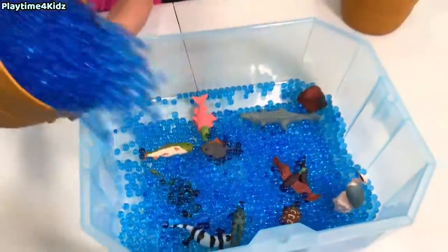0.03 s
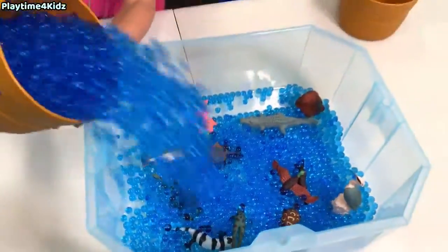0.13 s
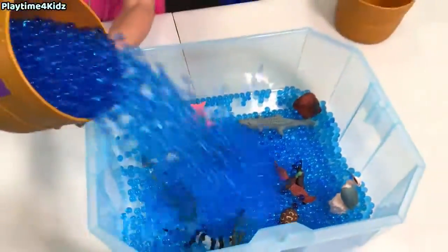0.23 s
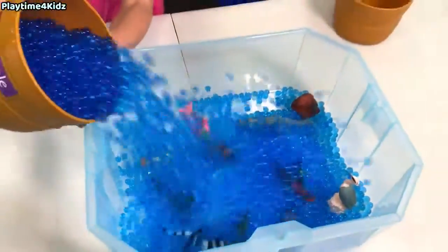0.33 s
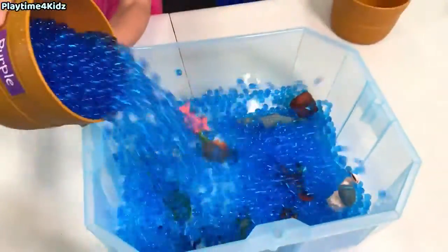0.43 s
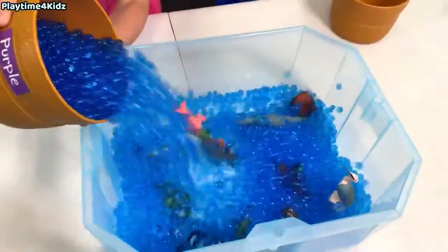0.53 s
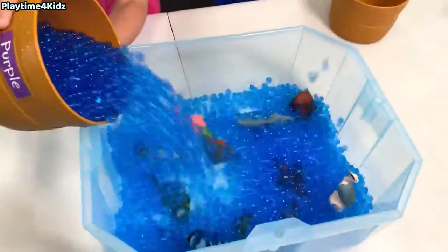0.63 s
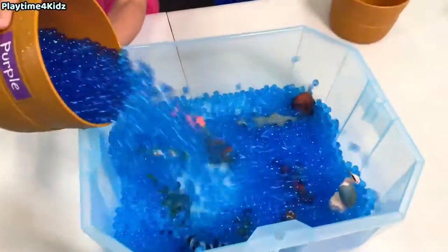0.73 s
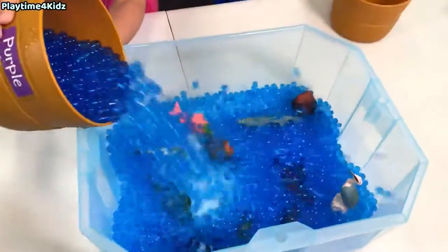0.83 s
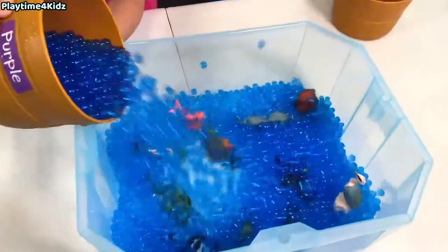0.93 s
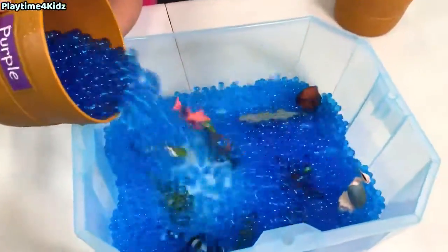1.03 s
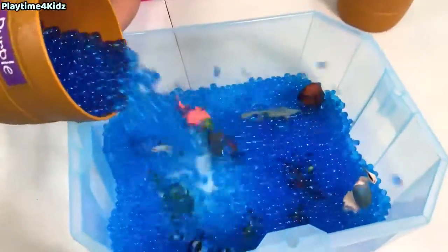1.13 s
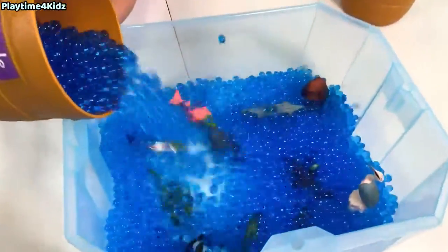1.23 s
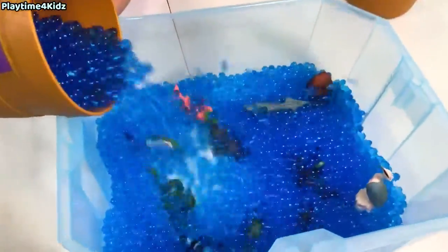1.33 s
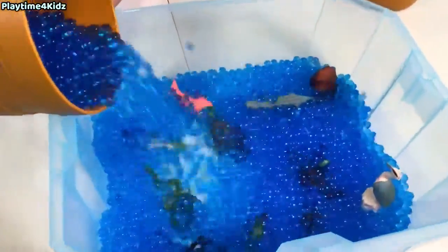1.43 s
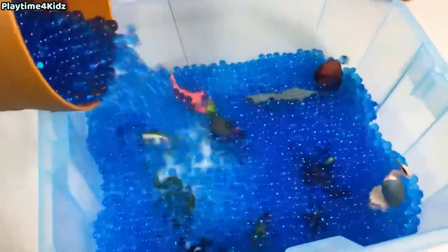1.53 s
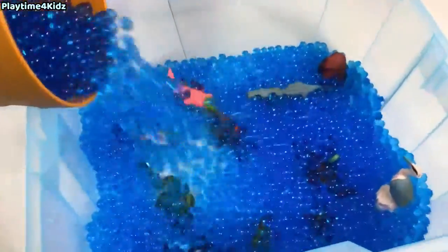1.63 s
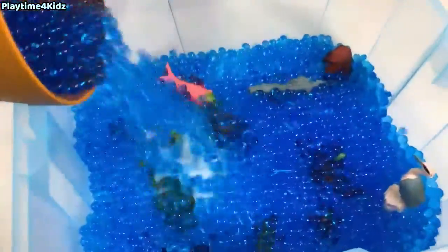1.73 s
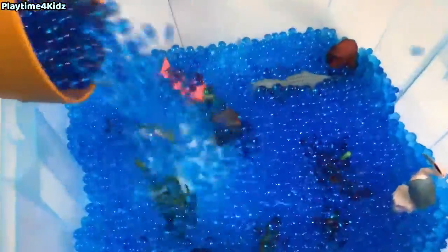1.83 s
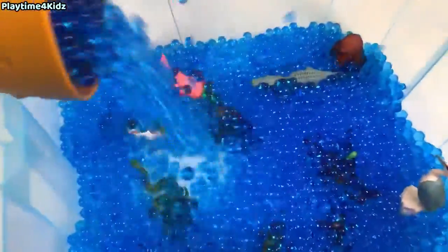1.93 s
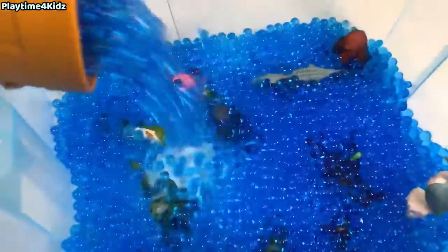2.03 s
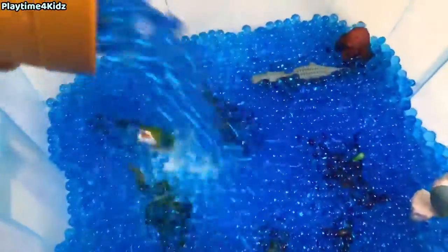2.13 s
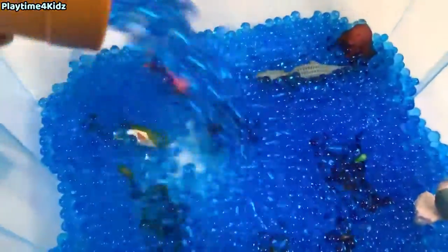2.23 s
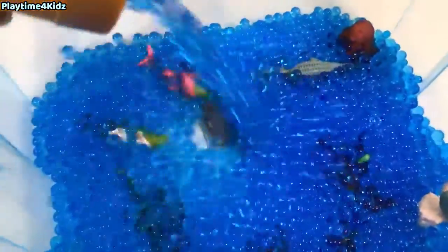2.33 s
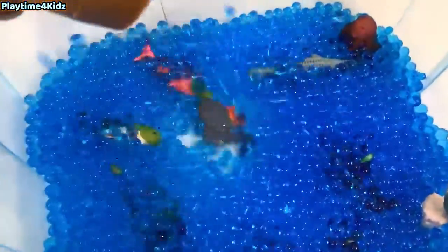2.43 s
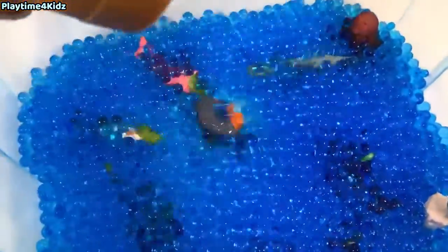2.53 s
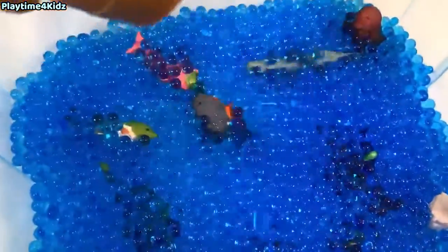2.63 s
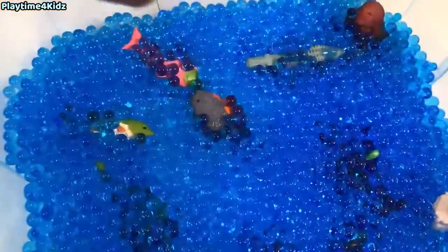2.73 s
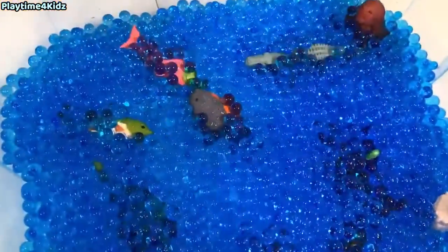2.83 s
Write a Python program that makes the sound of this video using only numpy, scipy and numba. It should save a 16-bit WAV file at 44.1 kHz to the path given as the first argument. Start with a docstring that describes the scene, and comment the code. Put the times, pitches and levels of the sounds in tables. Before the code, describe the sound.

After a brief near-quiet, thousands of soft gel beads patter and slap into a hollow, dully resonant plastic bin, heard close in a quiet room; the last drops tick and fizz before the pour stops.

```python
"""Soft wet gel beads pour from a bowl into a plastic bin, close to a two-port microphone in a quiet room.
Faint patter and wet ticks, which are short bands of noise, come first over steady coloured room noise.
Then thousands of soft blows drive the bin's resonant modes, beads patter as noisy splats and small pings,
and clumps slap down as bursts of crackle. Late on, the last wet beads leave the bowl with bright ticks
over a fizz of draining film, before the bin rings out."""
import sys
import numpy as np
from scipy import signal
from scipy.fft import rfft, irfft, next_fast_len
from scipy.io import wavfile
from scipy.ndimage import uniform_filter1d
from numba import njit

SR = 44100
rng = np.random.default_rng(int(sys.argv[2]) if len(sys.argv) > 2 else 0)


def unload_wav(signal):
    """Save mono or channel-first audio to the path in sys.argv[1] as 16-bit WAV at rate SR, clipped to [-1, 1]."""
    wavfile.write(
        sys.argv[1],
        SR,
        np.round(np.clip(np.atleast_2d(signal).T, -1, 1) * 32767).astype(np.int16),
    )


N = 125685
T = np.arange(N) / SR
FFT_SIZE = next_fast_len(N)
HZ = np.fft.rfftfreq(FFT_SIZE, 1 / SR)

# Spectrum of the room noise. Each row: frequency in Hz, relative density in dB per Hz.
ROOM_SPECTRUM = [(25, 15), (60, 13.5), (130, -12.5), (285, -10), (480, -30), (900, -18), (1200, -10),
                 (1900, -20.5), (4000, -17.5), (7000, -25), (12000, -27.5), (16000, -36)]
ROOM_DB = -47

# Course of the pour. Each row: time in seconds, force of the blows on the bin's floor in dB,
# force on its walls in dB, level of the dull patter in dB, level of the bright patter in dB.
POUR_COURSE = [(0.0, -34, -51, -66, -75), (0.02, -37.5, -59.5, -59, -56), (0.16, -50, -49.5, -58.5, -67),
               (0.24, -19, -26, -36.5, -42), (0.35, -24, -22, -32.5, -41), (0.61, -22.5, -21, -33.5, -45.5),
               (0.83, -19, -22.5, -31.5, -42.5), (0.9, -26, -23, -36, -49), (1.03, -21, -22, -32.5, -40.5),
               (1.13, -27, -27.5, -39, -48), (1.23, -25, -22.5, -35.5, -43.5),
               (1.6, -28.5, -28, -42.5, -50.5), (1.75, -25, -27, -36, -47), (1.79, -18, -29, -40, -46),
               (2.11, -33, -24.5, -42, -51.5), (2.2, -16, -25, -46, -51.5), (2.4, -25.5, -28.5, -54, -54.5),
               (2.43, -13.5, -25, -72, -46.5), (2.59, -23, -38.5, -56.5, -65),
               (2.67, -37.5, -50, -66.5, -58.5), (2.85, -62, -66, -60.5, -62)]

# Modes of the bin's floor and walls. Each row: frequency in Hz, relative level in dB,
# t60 in seconds, before the limit.
BIN_MODES = [(108.3, -14.5, 0.22), (122.6, -7.5, 0.18), (169.4, -19.5, 0.2), (185.7, -5.5, 0.23),
             (232, -5, 0.22), (268, -5, 0.15), (342, -11, 0.087), (397.4, -5, 0.045), (450, -4, 0.076),
             (519, -8, 0.026), (630, -13, 0.031), (771, -7, 0.037), (980, -17, 0.017)]
FLOOR_TOP_HZ = 145  # modes below this belong to the floor, the rest to the walls
LONGEST_T60_S = 0.19  # upper limit on the ringing of any mode
BLOWS_PER_S, BLOW_SPREAD_DB, CONTACT_S = 900, 2.5, 0.00033
COMMON_PUSH = 0.3  # part of every blow that drives all modes the same way
THUMP_S = 0.0005  # a soft clump pushes longer than one bead
THUMP_GAIN_DB = 26.5
THUMP_FLOOR_DB, THUMP_ODD = -10, 0.7  # drives the floor less, and neighbouring modes unequally

# Spectrum of the patter. Each row: frequency in Hz, relative density in dB per Hz.
PATTER_SPECTRUM = [(410, -7.5), (700, -1.5), (776, -3), (929, -11), (1500, -10.5), (1660, -5), (1900, -10),
                   (2060, -10.5), (2600, -16), (2950, -12.5), (3200, -14.5), (3380, -12.5), (4100, -17.5),
                   (4500, -18), (4960, -22.5), (6330, -24), (7300, -26), (9200, -27), (11300, -35),
                   (15200, -35.5)]
PATTERS_PER_S, PATTER_SPREAD_DB = 2500, 3.8
SPLAT_S, SPLAT_RISE_S = 0.0008, 0.0004
PINGS_PER_S, PING_SPREAD_DB = 6000, 3.6
PING_LOW_HZ, PING_HIGH_HZ = 698.5, 14360
PING_CYCLES = 4.0  # cycles in which a ping falls by a factor e
SPLIT_HZ = 3140  # between dull and bright

# Wet ticks of single beads. Each row: start in seconds, relative level in dB, pitch in Hz.
TICK_EVENTS = [(0.0034, -33.5, 3500), (0.0853, -42, 5400), (0.189, -29, 1970), (0.22, -31, 1910),
               (2.2205, -50, 3800), (2.252, -23, 7440), (2.2654, -33, 13600), (2.2774, -32, 4380),
               (2.2934, -24.5, 9400), (2.3204, -39, 8870), (2.335, -30, 14000), (2.3444, -29, 8400),
               (2.35, -26, 8600), (2.382, -32, 9400), (2.393, -18.5, 9400), (2.4002, -23, 9200),
               (2.405, -20.5, 9500), (2.426, -27.5, 4930), (2.4413, -19, 9400), (2.4501, -20.5, 7170),
               (2.4676, -26.5, 8400), (2.4874, -30, 6730), (2.514, -29, 6400), (2.541, -30, 13800),
               (2.584, -39.5, 9000), (2.6966, -40.5, 6500), (2.7825, -36.5, 4860)]
TICK_S, TICK_WIDTH = 0.0015, 0.19  # decay, bandwidth / pitch
TICK_SPLASH_DB = -5  # broad part of a tick, against its pitched part

# Wet film draining off the bowl. Each row: time in seconds, level of the fizz in dB.
FIZZ_COURSE = [(2.15, -61), (2.23, -51), (2.26, -45), (2.3, -37), (2.33, -48.5), (2.355, -38), (2.375, -50),
               (2.4, -43), (2.45, -39), (2.49, -43), (2.51, -52), (2.55, -52.5), (2.62, -84)]
# Spectrum of fizz and tick splash. Each row: frequency in Hz, relative density in dB per Hz.
FIZZ_SPECTRUM = [(1760, 2), (3000, 7), (5200, 1), (6800, 3), (7640, 0.5), (8880, 3), (11400, -1.5),
                 (13500, 1.5), (15500, -6)]
FIZZ_PER_S, FIZZ_SPREAD_DB = 2500, 3.5
FIZZ_WANDER_PER_S, FIZZ_WANDER_DB = 40, 2.0

# Clumps slapping down. Each row: time in seconds, level of the slap in dB,
# brightness (treble gain) in dB, relative thump on the bin in dB.
SLAP_EVENTS = [(0.19, -26, -7, -26), (0.2199, -25, -10, -28), (0.2298, -24, 4, -23), (0.2688, -36, 14, -48),
               (0.2952, -14.5, -4, -40), (0.3123, -25, 4, -27), (0.3305, -25, 4, -19),
               (0.3594, -18.5, 7.5, -48), (0.4468, -9, -0.5, -37), (0.4879, -28, 6, -14.5),
               (0.5335, -26, -5, -18), (0.562, -12, 4.5, -22), (0.6498, -23, 11, -16),
               (0.6902, -16, 2, -24), (0.7476, -16.5, 10, -45), (0.7836, -12.5, -5, -10.5),
               (0.8199, -12.5, 4.5, -44), (0.9816, -10, 0.5, -45), (1.0235, -29, 15, -18.5),
               (1.074, -18, -4, -39), (1.1726, -22, 2, -23), (1.1956, -17.5, 5, -21),
               (1.2175, -16.5, 6, -20), (1.2605, -13, 8, -25), (1.3268, -21, 11, -33),
               (1.3417, -12, 9.5, -42), (1.3974, -13.5, -21, -17.5), (1.448, -20, 1, -17),
               (1.505, -16, 3, -14.5), (1.5594, -18, -3, -16.5), (1.6146, -9, -4, -49),
               (1.6277, -20.5, 0, -48), (1.675, -14.5, -1, -16.5), (1.715, -20.5, 4, -18),
               (1.7453, -11, 1.5, -30), (1.7594, -20.5, 1, -46), (1.8451, -15.5, 2.5, -21),
               (1.8594, -15.5, -1, -35), (1.8994, -18.5, 2.5, -22), (1.9285, -35, 14, -45),
               (2.0572, -18.5, -6, -21.5), (2.094, -17, 3.5, -39), (2.1489, -15, 3.5, -19),
               (2.35, -16.5, 0, -20.5), (2.4094, -40, 22, -17), (2.4334, -19, 0, -15.5),
               (2.4699, -31.5, 5, -27), (2.53, -32, -7, -40), (2.5432, -30, 3, -34), (2.556, -26, 0, -27),
               (2.5854, -43, 3, -26.5)]
# Spectrum of a slap. Each row: frequency in Hz, relative density in dB per Hz.
SLAP_SPECTRUM = [(410, 3), (700, 8), (1250, -4.5), (1870, -5), (3840, -7.5), (4430, -12), (7490, -19.5),
                 (8210, -17), (14000, -29), (16000, -51)]
CRACKLE_PER_S, CRACKLE_SPREAD_DB = 2500, 2.5  # beads inside a clump
SLAP_RISE_S, SLAP_S = 0.0033, 0.00086
SLAP_TAIL_S, SLAP_TAIL_DB = 0.015, -18.5
SLAP_LEAD_S, SLAP_LEAD_DB = 0.0039, -19  # the first beads of a clump arrive early

# Phase between the ports. Each row: frequency in Hz, lead of the left port in radians.
PORT_LEAD = [(0, 0), (600, .4), (1290, .6), (1890, 1.2), (2580, 2.1), (3790, 3.2), (5170, 4.3), (6200, 6.1),
             (7150, 9.2), (8440, 7), (11800, 2.8), (13100, .2), (15200, -1.5), (16000, -2.5)]
# Level between the ports. Each row: frequency in Hz, left minus right in dB.
PORT_LEAN = [(60, 0), (380, 0), (700, 1.5), (1290, 3.5), (2380, 2), (4400, 0), (8120, -3), (15000, 0)]
# What each port hears alone, since beads land all over the bin.
# Each row: frequency in Hz, gain in dB against the shared sound.
PORT_ALONE = [(30, -9), (100, -20), (200, -21), (350, -17), (700, -8), (1400, 0), (4000, 0), (9000, -1.5),
              (16000, -2.5)]
LOW_CUT_HZ, TOP_HZ = 66, 16300


def undb(db):
    """Logarithmic level: amplitude gain is 10 to the power dB / 20."""
    return 10 ** (np.asarray(db) / 20)


def unit(x):
    """Normalisation of power: scale to rms 1."""
    return x / np.sqrt(np.mean(x ** 2))


def level_over_time(table, column=1):
    """Amplitude envelope: a dB column interpolated over time, as gain."""
    rows = np.array(table)
    return undb(np.interp(T, rows[:, 0], rows[:, column]))


def over_log_hz(table):
    """Logarithmic frequency scale: interpolate a table's dB along it."""
    hz, db = np.array(table).T
    return np.interp(np.log(HZ + 1), np.log(hz), db)


def colour(x, table):
    """Linear filtering: multiply the spectrum by a gain curve, keeping the phase."""
    return irfft(rfft(x, FFT_SIZE) * undb(over_log_hz(table)), FFT_SIZE)[..., :N]


def decay(x, seconds):
    """First-order relaxation: every impulse gains an exponential tail."""
    return signal.lfilter([1], [1, -np.exp(-1 / (seconds * SR))], x + 1e-18)


def noise():
    """Uncorrelated sources: three white noises, for shared, left alone and right alone."""
    return rng.standard_normal((3, N))


def rain(per_s, spread_db):
    """Random arrivals: independent impulses, a few much larger than the rest."""
    when = rng.random(N)
    size = np.minimum(rng.exponential(size=N), 4)
    return (when < per_s / SR) * undb(spread_db * size)


def wander(per_s):
    """Random modulation: levels held 1 / rate s and slewed, with rms 1."""
    hold = int(SR / per_s)
    steps = rng.standard_normal(N)[np.arange(N) // hold]
    return unit(uniform_filter1d(steps, hold // 2))


def spikes(table, column):
    """Impulsive excitation: one impulse per event row, sized by a dB column."""
    rows = np.array(table)
    out = np.zeros(N)
    out[(rows[:, 0] * SR).astype(int)] = undb(rows[:, column])
    return out


def split(x):
    """Complementary bands: a zero-phase low-pass gives the dull part, the remainder is bright."""
    dull = signal.sosfiltfilt(signal.butter(2, SPLIT_HZ, fs=SR, output="sos"), x)
    return dull, x - dull


def room_air():
    """Stationary noise: a constant coloured floor, partly shared and partly each port's own."""
    return undb(ROOM_DB) * unit(colour(noise(), ROOM_SPECTRUM))


def bin_modes(floor_blows, wall_blows, thumps):
    """Modal superposition: small blows drive each mode their own way, a thump drives them all."""
    out, places = 0, noise()
    inward = np.array([[1], [0], [0]])  # the common push is in the shared sound only
    for k, (hz, db, t60) in enumerate(BIN_MODES):
        radius = np.exp(-np.log(1000) / (min(t60, LONGEST_T60_S) * SR))
        angle = 2 * np.pi * hz / SR
        blows = wall_blows if hz > FLOOR_TOP_HZ else floor_blows
        # shifting the noise gives each mode its own drive
        force = blows * (np.roll(places, 997 * k, axis=1) - COMMON_PUSH * inward)
        thump_gain = (1 + THUMP_ODD * (-1) ** k) * undb(THUMP_FLOOR_DB * (hz < FLOOR_TOP_HZ))
        force = force - thumps * inward * thump_gain
        poles = [1, -2 * radius * np.cos(angle), radius * radius]
        ringing = signal.lfilter([np.sin(angle)], poles, force)
        out = out + undb(db) * np.sqrt(1 - radius) * ringing
    # a soft contact of finite length dulls the drive
    return decay(out, CONTACT_S) / (CONTACT_S * SR)


@njit
def pings(size, hz, phase, cycles, sr):
    """Damped free oscillation: every impulse rings a few cycles at its own pitch."""
    out = np.zeros(phase.shape)
    for i in range(len(size)):
        if size[i] > 0:
            turn = np.exp((2j * np.pi - 1 / cycles) * hz[i] / sr)
            end = min(i + int(5 * cycles * sr / hz[i]), len(size))
            for row in range(3):
                z = size[i] * np.exp(1j * phase[row, i])
                for k in range(i, end):
                    out[row, k] += z.imag
                    z *= turn
    return out


def wet_beads(per_s, spread_db, gain, spectrum):
    """Impact of bead on bead: short noisy splats and small pings in equal measure, coloured alike."""
    hits = rain(per_s, spread_db) * gain
    splats = decay(decay(hits, SPLAT_S), SPLAT_RISE_S) * noise()
    hz = rng.uniform(PING_LOW_HZ, PING_HIGH_HZ, N)
    # the root of pitch offsets the shorter ringing of high pings
    struck = rain(PINGS_PER_S, PING_SPREAD_DB) * gain * np.sqrt(hz)
    phase = 2 * np.pi * rng.random((3, N))
    rung = pings(struck, hz, phase, PING_CYCLES, 1.0 * SR)
    return unit(colour(unit(splats) + unit(rung), spectrum))


def stream():
    """Forced vibration and impact noise: blows and thumps drive the bin under the patter of beads."""
    blows = unit(rain(BLOWS_PER_S, BLOW_SPREAD_DB))
    thumps = undb(THUMP_GAIN_DB) * spikes(SLAP_EVENTS, column=3)
    thumps = decay(decay(thumps, THUMP_S), THUMP_S) / (THUMP_S * SR) ** 2
    floor_blows = blows * level_over_time(POUR_COURSE, column=1)
    wall_blows = blows * level_over_time(POUR_COURSE, column=2)
    drum = bin_modes(floor_blows, wall_blows, thumps)
    dull, bright = split(wet_beads(PATTERS_PER_S, PATTER_SPREAD_DB, 1.0, PATTER_SPECTRUM))
    dull = unit(dull) * level_over_time(POUR_COURSE, column=3)
    bright = unit(bright) * level_over_time(POUR_COURSE, column=4)
    return drum + dull + bright


def ticks():
    """Narrow-band transients: each wet bead pops at its own pitch inside a small splash."""
    out, t = np.zeros((3, N)), np.arange(1024) / SR
    envelope = t / TICK_S * np.exp(-t / TICK_S)
    splash = undb(TICK_SPLASH_DB) * unit(colour(noise(), FIZZ_SPECTRUM))
    for start, db, hz in TICK_EVENTS:
        edges = [hz * (1 - TICK_WIDTH / 2), hz * (1 + TICK_WIDTH / 2)]
        band = signal.butter(2, edges, "bandpass", fs=SR, output="sos")
        pitched = unit(signal.sosfilt(band, rng.standard_normal((3, 1024))))
        i = int(start * SR)
        out[:, i:i + 1024] += undb(db) * (pitched + splash[:, i:i + 1024]) * envelope
    return out


def slaps():
    """Burst of impacts: a landing clump is crackle under a few ms of envelope with a short tail."""
    def envelope(hits):
        """Sum of exponentials: a main burst, a weak tail and a weak lead."""
        quick = decay(hits, SLAP_RISE_S) / (SLAP_RISE_S * SR)
        tail = undb(SLAP_TAIL_DB) * decay(quick, SLAP_TAIL_S)
        # decaying in reversed time makes the lead swell before the hit
        lead = undb(SLAP_LEAD_DB) * decay(quick[::-1], SLAP_LEAD_S)[::-1]
        return decay(quick, SLAP_S) + tail + lead

    hits = spikes(SLAP_EVENTS, column=1)
    brightness = spikes(SLAP_EVENTS, column=2)
    crackle = noise() * decay(rain(CRACKLE_PER_S, CRACKLE_SPREAD_DB), SPLAT_RISE_S)
    dull, bright = split(unit(colour(crackle, SLAP_SPECTRUM)))
    return envelope(hits) * dull + envelope(hits * brightness) * bright


def fizz():
    """Dense random impacts: draining film makes fine splats and pings whose level wanders."""
    gain = undb(FIZZ_WANDER_DB * wander(FIZZ_WANDER_PER_S))
    beads = wet_beads(FIZZ_PER_S, FIZZ_SPREAD_DB, gain, FIZZ_SPECTRUM)
    return beads * level_over_time(FIZZ_COURSE)


def scene():
    """Partial coherence: two ports share a sound in their own phase and level, and each adds its own."""
    shared, *own = stream() + ticks() + slaps() + fizz()
    air, *air_alone = room_air()
    lead = np.interp(HZ, *np.array(PORT_LEAD).T)
    lean = over_log_hz(PORT_LEAN)
    side = np.array([[1], [-1]])  # left, right
    alone = colour(np.array(own) + air_alone, PORT_ALONE)
    ports = rfft(shared, FFT_SIZE) * np.exp(0.5j * side * lead) + rfft(air + alone, FFT_SIZE)
    return irfft(ports * undb(side * lean / 2), FFT_SIZE)[:, :N]


def record(dry):
    """Band limitation: little deep bass below about 66 Hz, and next to nothing above about 16 kHz."""
    # the high-pass keeps the bin's pushes from adding deep bass
    firm = signal.sosfilt(signal.butter(2, LOW_CUT_HZ, "high", fs=SR, output="sos"), dry)
    return signal.sosfilt(signal.ellip(10, 0.2, 70, TOP_HZ, fs=SR, output="sos"), firm)


dry = scene()
out = record(dry)
unload_wav(out)
```